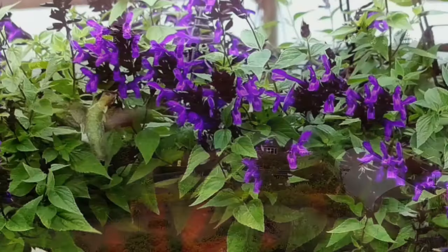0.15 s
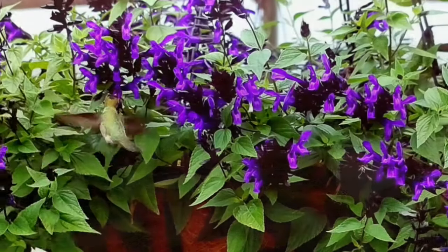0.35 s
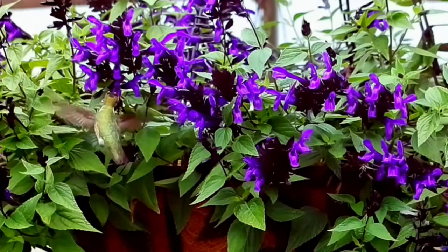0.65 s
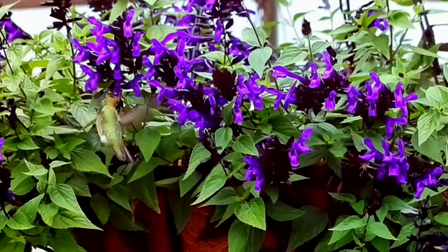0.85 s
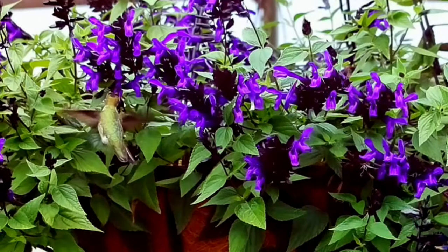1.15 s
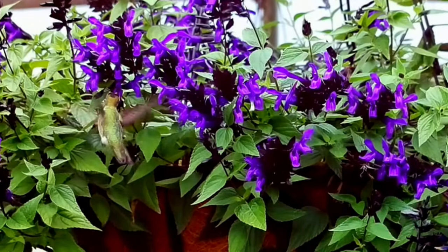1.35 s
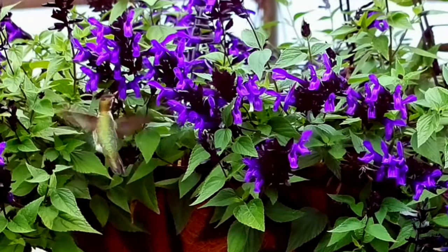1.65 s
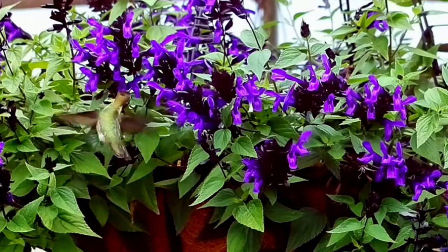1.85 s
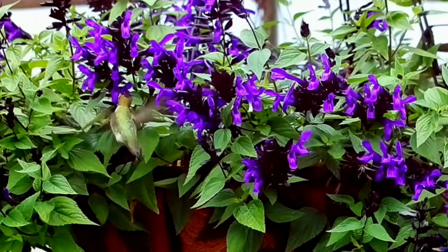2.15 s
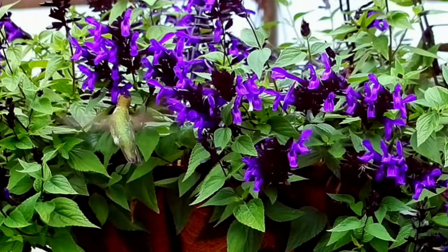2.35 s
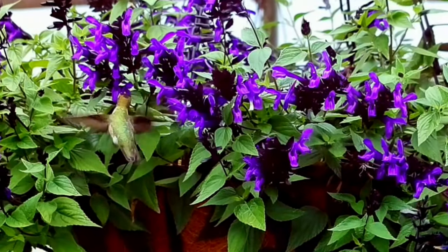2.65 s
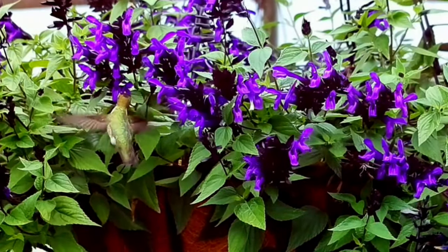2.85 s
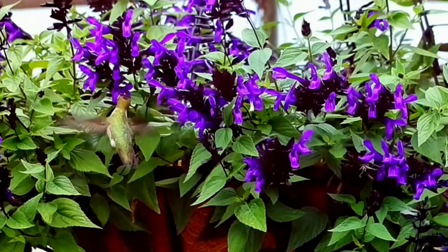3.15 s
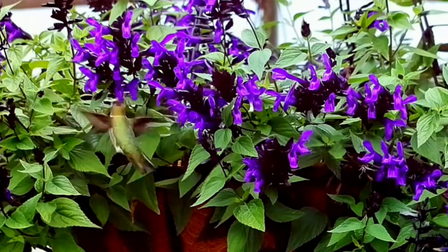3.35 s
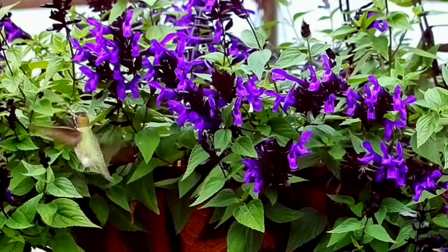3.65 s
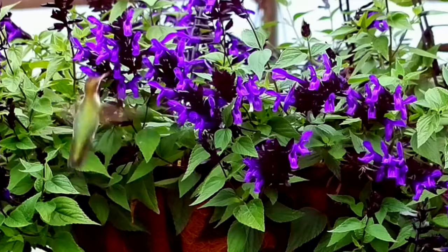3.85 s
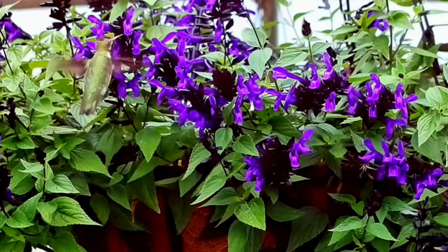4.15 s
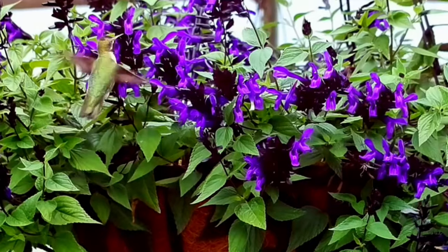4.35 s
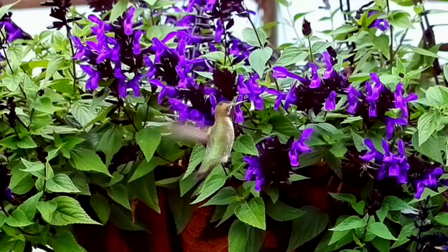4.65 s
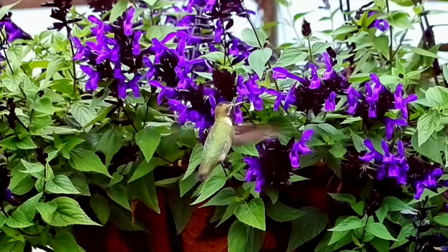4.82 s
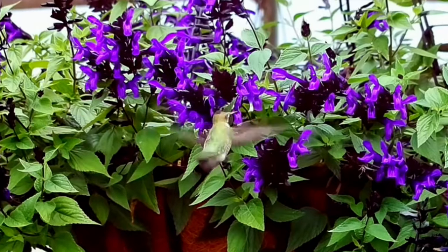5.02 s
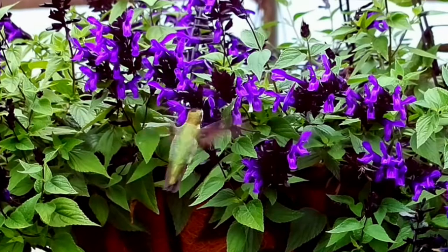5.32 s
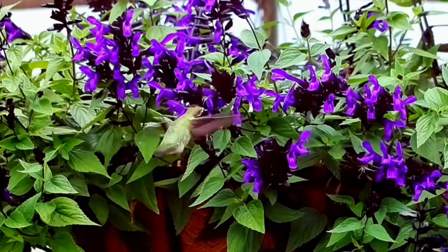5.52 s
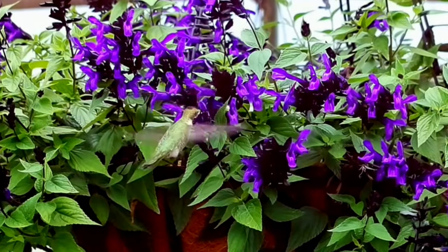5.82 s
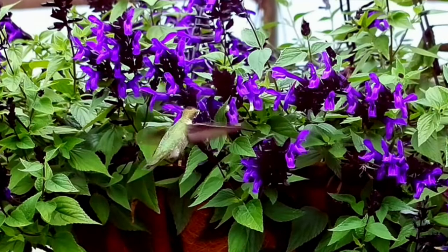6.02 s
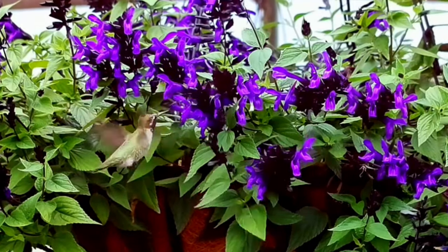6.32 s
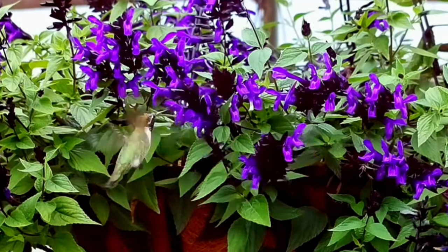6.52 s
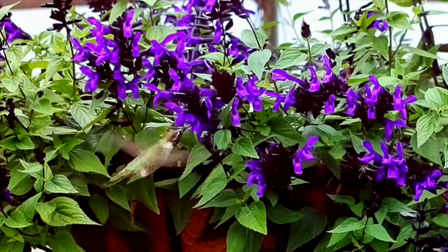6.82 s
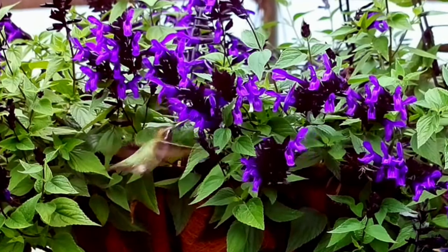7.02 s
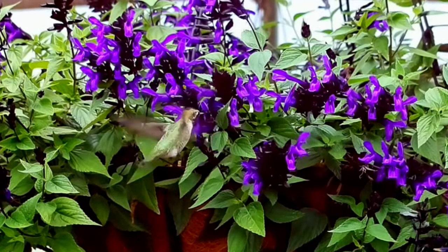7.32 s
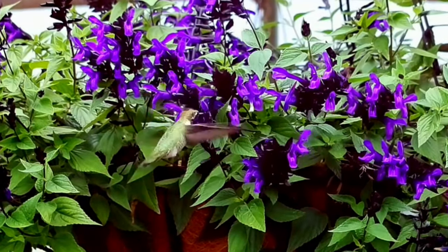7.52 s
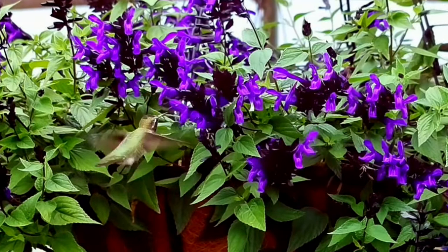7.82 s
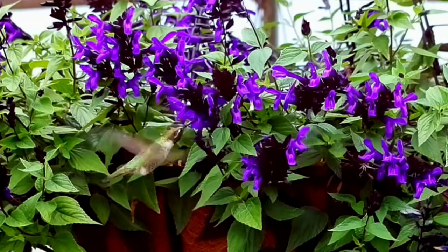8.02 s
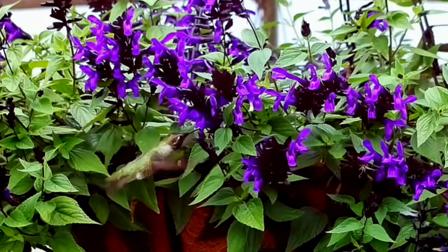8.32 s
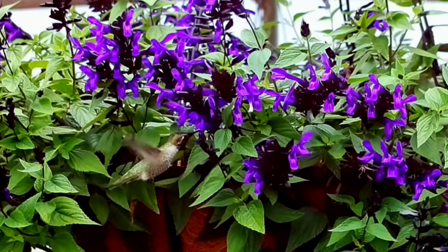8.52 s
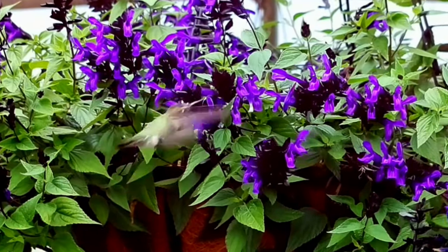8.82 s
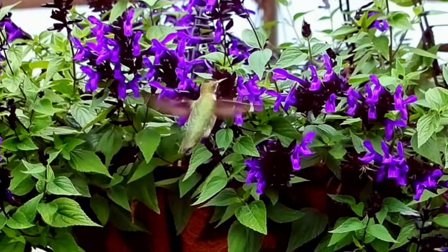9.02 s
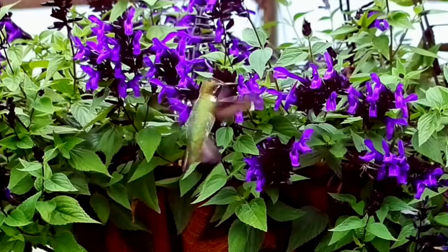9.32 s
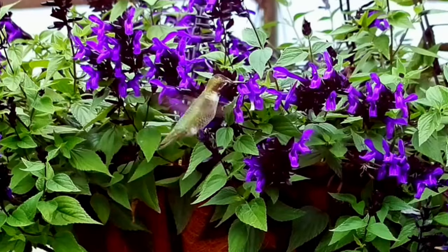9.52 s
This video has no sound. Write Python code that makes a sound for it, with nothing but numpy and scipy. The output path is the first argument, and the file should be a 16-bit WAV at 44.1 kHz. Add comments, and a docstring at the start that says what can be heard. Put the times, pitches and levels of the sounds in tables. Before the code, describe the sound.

A hummingbird gives five sharp high chips, pauses, then breaks into a long squeaky, buzzing chatter over faint outdoor hiss.

```python
"""Hummingbird in a garden.

Five sharp falling chips, a pause, then a long squeaky scolding chatter. The syrinx buzzes in fast
pulses, whines with both sides at once and breaks into rasps that end in squeals. One song figure of
whine, buzz, screech and squeal comes four times. Leaves and nearby walls scatter the calls over a
thin outdoor hiss."""
import sys
import numpy as np
from scipy import signal
from scipy.fft import rfft, irfft, next_fast_len
from scipy.io import wavfile
from scipy.ndimage import uniform_filter1d, map_coordinates

SR = 44100
rng = np.random.default_rng(int(sys.argv[2]) if len(sys.argv) > 2 else 0)


def wav_out(sig):
    """Save sig, one row per channel (or a flat mono array), as 16-bit PCM at SR to the path in sys.argv[1]."""
    wavfile.write(sys.argv[1], SR, np.round(np.clip(np.atleast_2d(sig).T, -1, 1) * 32767).astype(np.int16))


N = 426447
TIME_S = np.arange(N) / SR
TOP_HZ = 15950

# Call levels are set ahead of swells, filters and scatter.
# Each row: start in seconds, level in dB, length in seconds, top and bottom pitch in Hz,
# low-end gain in dB.
CHIP_NOTES = [(0.2345, -17, 0.013, 8580, 2580, 1), (0.4914, -17, .013, 8800, 2135, -1.5),
              (0.7666, -15.5, 0.012, 8730, 2670, 1), (1.017, -15.5, .0115, 8700, 2490, 2.5),
              (1.2845, -16, .0125, 8700, 2170, 5.5)]
# Sweep of a chip. Each row: share of length, share of pitch range, gain in dB.
CHIP_SHAPE = [(0, 0.99, -36), (.08, .98, -5), (.2, .92, -1.5), (.42, .77, 0.5), (0.581, .6, -1.5),
              (.7, .4, 1.5), (.8, 0.223, -9), (.92, 0.115, -14), (1, 0, -34)]
# Each row: start, attack and length in seconds, level in dB, pitch in Hz, base octave gain in dB,
# swoop depth, settling time in seconds, gain on settling in dB.
BUZZ_PHRASES = [(3.14, .075, 0.25, -36, 6940, -3.5, .14, .15, 3.5),
                (3.443, .018, .24, -31.3, 6560, -12.5, .22, 0.16, 4.5),
                (3.749, 0.02, 0.24, -37, 6635, -9.5, 0.23, 0.14, 8),
                (4.065, 0.079, 0.36, -33.5, 6905, -7.5, 0.19, .29, 3.5),
                (4.513, 0.011, 0.12, -38, 6620, -2, .18, 0.084, 0.5),
                (4.638, 0.0087, 0.17, -45.5, 6600, -14, .24, .12, 8.5),
                (4.923, .015, 0.19, -52, 6730, -5, 0.067, 0.083, -2),
                (5.131, 0.025, 0.18, -53, 7100, -5, .15, 0.14, 0),
                (5.987, .04, .05, -40.5, 6900, -9, .14, .05, 1.5),
                (6.686, 0.042, 0.28, -35.5, 6570, -8, .19, .225, 6),
                (7.024, 0.0099, .24, -36.8, 6220, -9, .28, .13, 5.5),
                (7.317, 0.013, .25, -35.5, 6107, -10.5, 0.18, 0.14, 5.5),
                (7.629, 0.056, 0.16, -41, 6370, -5.5, .18, .15, -2),
                (7.9, 0.015, .062, -43.5, 6050, -21, 0.2, .045, 3),
                (8.039, 0.057, 0.13, -50, 6550, -8, .1, 0.1, 5),
                (8.649, 0.058, 0.17, -42, 6590, -7, 0.24, 0.12, 12),
                (9.541, 0.016, 0.025, -33.5, 6470, -6, 0.16, 0.023, 0.5)]
# Each row: start and length in seconds, level in dB, swell in dB.
RASP_NOTES = [(4.621, 0.2, -44.5, 1.5), (7.773, 0.089, -40.5, -4.5), (7.882, 0.0016, -30, -1),
              (8.456, 0.0018, -44, -1), (8.679, 0.116, -46.5, 8)]
# One list per squeal. Each row: time in seconds, pitch in Hz, level in dB, roughness from 0 to 1.
SQUEAL_CONTOURS = [
    [(5.185, 4230, -41, .8), (5.225, 4320, -44.5, 0.9), (5.243, 4300, -32, 0.7), (5.265, 4100, -50, 0.5)],
    [(5.272, 4020, -40, 0.14), (5.289, 4700, -29, 0.22), (5.306, 4120, -21.5, 0.3), (5.32, 4380, -35, 0.26),
     (5.345, 4230, -46, 0.42), (5.362, 4270, -32.5, 0.4), (5.39, 4150, -50, 0.4), (5.43, 4430, -55, 0.3)],
    [(7.725, 4580, -44, 0.6), (7.738, 4300, -29.5, 0.6), (7.752, 4070, -40, 0.3)],
    [(8.285, 4600, -44, 0.5), (8.315, 4430, -37.5, 0.6), (8.35, 4200, -37.5, 0.7), (8.368, 3920, -51, 0.6)],
]
# Each row: start and length in seconds, low and high voice in Hz, scoop in octaves, swell in dB,
# level in dB, droop in octaves.
WHINE_NOTES = [(5.116, 0.053, 3690, 5210, .13, 9.5, -41, 0), (8.213, .07, 3450, 5150, .38, 13.5, -43.5, 0)]
# Each row: multiple of the low voice, multiple of the high voice, gain in dB.
WHINE_PARTIALS = [(1, 0, -2), (0, 1, -3), (2, 0, -3), (1, 1, -3.5), (0, 2, -9.5), (3, 0, -4), (2, 1, -6.5)]
# Each row: start and length in seconds, start and end pitch in Hz, level in dB, octave gain in dB,
# roughness from 0 to 1.
PEEP_NOTES = [(0.686, 0.076, 2370, 2260, -60, -23, 0), (0.849, 0.048, 2434, 2402, -50.5, -18, 0),
              (0.987, 0.029, 3460, 3620, -48, -23, .2), (1.11, 0.033, 8260, 8380, -42.5, -30, 0.06),
              (1.644, 0.07, 4670, 4830, -56, 3.5, 1), (2.456, 0.051, 6200, 7040, -50.5, -32, 0.5),
              (2.489, 0.048, 6670, 6750, -47.5, -26, 0.24), (4.635, .06, 2900, 3130, -51, 4, 0.83),
              (4.681, 0.043, 2930, 2820, -49, -5, 1), (4.742, 0.037, 2500, 2390, -47.5, -6, 1),
              (4.774, 0.052, 2320, 2374, -45.5, -11, 0.7), (7.763, 0.033, 3200, 2640, -49, 3, 0.78),
              (7.892, 0.032, 2374, 2390, -44.5, 3, 0.6)]
# Each row: time in seconds, pitch in Hz, level in dB.
TRILL_CONTOUR = [(5.33, 4270, -50), (5.39, 4320, -46), (5.445, 4170, -42.5), (5.5, 4350, -39.5),
                 (5.555, 4510, -41)]
# Each row: start in seconds, level in dB, nominal pitch in Hz.
TICK_NOTES = [(3.0819, -43.5, 6430), (3.115, -34, 7200), (3.143, -35, 7500), (3.2043, -25.5, 6730),
              (3.2528, -25.5, 6670), (3.273, -23, 6480), (4.0892, -24, 7160), (4.123, -20, 6860),
              (4.5263, -24.5, 6680), (4.6185, -25.5, 6850), (4.798, -22, 6750), (6.6445, -32.5, 6160),
              (6.6777, -28.5, 6730), (6.713, -29, 8140), (6.7282, -24, 6260), (7.0333, -28, 6760),
              (7.3285, -25, 6230), (7.4688, -17.5, 6400), (7.8815, -25.5, 3890), (7.9574, -28.5, 6940),
              (8.457, -33.5, 6550), (8.6574, -31, 7050), (8.7837, -19, 6870)]

# Song figures. Each row: start in seconds, whine, buzz and climax level in dB, whine droop in octaves.
SONG_FIGURES = [(5.671, -44, -38.5, -20.5, .02), (6.161, -44.3, -40.5, -19.5, .055),
                (8.911, -39.5, -38, -19.5, .095), (9.421, -40.5, -39, -21.5, .06)]
# Length in seconds, low and high voice in Hz, scoop in octaves, swell in dB.
FIGURE_WHINE = (.112, 4820, 5260, .07, 4.1)
# Delay, attack and length in seconds, pitch in Hz, base octave gain in dB, swoop depth.
FIGURE_BUZZ = (0.13, .012, 0.22, 6549.5, -7.5, 0.27)
# Delay and length in seconds, level in dB re climax.
FIGURE_CLICK = (.227, 0.0079, -10)
# Delay and length in seconds, swell to the climax in dB.
FIGURE_SCREECH = (.241, .043, 17)
# Each row: delay in seconds, pitch in Hz, level in dB re climax, roughness from 0 to 1.
FIGURE_SQUEAL = [(.281, 4670, -10.5, 0.3), (.293, 4895, 0, 0.4), (.306, 4300, -12.5, .4),
                 (.318, 4160, -18.5, 0.6), (.345, 4020, -16, 0.66), (.37, 3900, -29, .8)]

# Voice spectra. Each row: frequency in Hz, gain in dB.
CHIP_EQ = [(1500, -11), (2500, 2), (3300, -2), (4200, -7.5), (5500, -1), (8000, 1), (11000, 2.5),
           (13000, 0), (14500, -15), (16000, -15)]
THROAT_EQ = [(3000, -15), (4300, -8.5), (4850, 1.8), (5300, 0), (6000, -0.5), (8300, 0.5), (9400, 2),
             (11400, 3), (12700, -4.5), (14000, -5), (16000, -5.5)]
BILL_RADIATION_EQ = [(1500, -7), (2500, -1.5), (5000, -2), (11000, 1), (13000, -4.5), (14500, -15.5),
                     (16000, -15.5)]
HOARSE_EQ = [(2000, -34), (4200, -31), (4900, 13), (5250, -3), (5700, 2.5), (7500, -3), (9000, -5.5),
             (11500, 1.5), (14000, -19), (16000, -17)]
SCREECH_EQ = [(1500, -35.5), (2700, -19.5), (3600, -7.5), (5000, 1.5), (8000, 1.5), (10000, -7),
              (13000, -11), (16000, -16.5)]
TURBULENCE_EQ = [(25, -19), (70, -21), (150, -16.5), (220, -18), (400, -12.5), (600, -14.5), (1200, -15),
                 (2800, -3.5), (5000, -4.5), (11000, 4.5), (16000, -2)]

# Outdoor hiss. Each row: time in seconds, nominal level at 1-2.2 kHz in dB.
HISS_LEVELS = [(0.0, -69.5), (1.44, -69), (1.7, -74), (3.3, -73), (5.6, -72), (6.3, -69.5), (7.85, -67.5),
               (8.4, -69.5), (9.67, -69)]
# Hiss spectra. Each row: frequency in Hz, gain in dB.
HISS_EARLY_EQ = [(24, -65), (40, -36), (77, -61), (130, -37), (410, -21.5), (1430, -7.5), (1660, -6),
                 (2300, -3), (3110, -2.5), (3350, -3.5), (8240, -2), (15800, -17)]
HISS_PAUSE_EQ = [(24, -77), (40, -36), (250, -37), (643, -31), (1030, -17), (1140, -15.5), (1470, -10.5),
                 (1750, -9), (2420, -6), (2960, -5.5), (3700, -7.5), (3990, -6), (15800, -19)]
HISS_LATE_EQ = [(24, -69), (40, -59), (49, -32), (431, -38), (526, -35), (596, -38), (1110, -19.5),
                (2030, -9.5), (5960, -2), (6420, -4), (8450, -7.5), (15800, -23.5)]
# Width of the opening hiss. Each row: frequency in Hz, side re mid in dB.
HISS_SIDE_EQ = [(60, -10), (180, -6), (550, -5), (1650, -10.5), (4970, -6.5), (15000, -5)]


def amp(db):
    """Decibels to gain."""
    return 10 ** (np.asarray(db) / 20)


def unit(x):
    """Scale to rms 1."""
    return x / np.sqrt(np.mean(x ** 2) + 1e-20)


def filtered(x, response):
    """Apply a gain given as a function of Hz."""
    size = next_fast_len(N + SR // 2)
    return irfft(rfft(x, size) * response(np.fft.rfftfreq(size, 1 / SR)), size)[..., :N]


def coloured(x, eq):
    """Apply a spectrum of (Hz, dB) points."""
    points_hz, db = np.transpose(eq)
    return filtered(x, lambda hz: amp(np.interp(np.log(hz + 1), np.log(points_hz), db)))


def shaped_noise(eq):
    """Scene-long coloured noise, rms 1."""
    return unit(coloured(rng.standard_normal(N), eq))


def wobble(rate_hz, n):
    """Smooth random curve, rate_hz knots a second."""
    knot_rng = np.random.default_rng(rng.integers(2 ** 31))
    knots = knot_rng.standard_normal(int(n * rate_hz / SR) + 4)
    return map_coordinates(knots, [np.arange(n) * rate_hz / SR], mode="nearest")


def phase_of(hz):
    """Running phase of a moving frequency."""
    return 2 * np.pi * np.cumsum(hz) / SR


def note(attack_s, length_s, release_s, onset_db=15.5, fade_db=27.5):
    """Time axis and envelope: attack, hold until length_s, release."""
    t = np.arange(int((length_s + release_s) * SR)) / SR
    gate = np.clip(np.minimum(t, t[-1] - t) / .001, 0, 1)
    attack_db = -onset_db * np.maximum(1 - t / attack_s, 0)
    release_db = -fade_db * np.maximum(t - length_s, 0) / release_s
    return t, gate * amp(attack_db + release_db)


def contour(rows):
    """Start time, soft gate and per-sample columns of a call."""
    times_s, *columns = np.transpose(rows)
    t = np.arange(times_s[0], max(times_s[-1], times_s[0] + .01), 1 / SR)
    gate = np.clip(np.minimum(t - t[0], t[-1] - t) / .0011, 0, 1)
    return times_s[0], gate, [np.interp(t, times_s, column) for column in columns]


def add(track, start_s, sound):
    """Mix a sound into the track."""
    part = track[max(round(start_s * SR), 0):][:len(sound)]
    part += sound[:len(part)]


def buzzes(pulse_hz=460, slack_hz=4900, settling_s=.02, settled_swoop=.072, push_db=12, push_s=.021):
    """Each syrinx pulse is a tiny chirp. A phrase starts swooping, stuttering and hoarse, then settles."""
    out, noise = np.zeros(N), shaped_noise(HOARSE_EQ)
    delay_s, attack_s, length_s, hz, octave_db, depth = FIGURE_BUZZ
    phrases = BUZZ_PHRASES + [(s + delay_s, attack_s, length_s, db, hz, octave_db, depth, length_s, 0)
                              for s, _, db, _, _ in SONG_FIGURES]
    for start_s, attack_s, length_s, db, hz, octave_db, depth, settle_s, settle_db in phrases:
        t, envelope = note(attack_s, length_s, release_s=.032)
        n = len(t)
        settled = np.clip(.5 + (t - settle_s) / settling_s, 0, 1)
        progress = np.clip((t - settle_s) / max(t[-1] - settle_s, settling_s), 0, 1)
        arch = settled * (np.sin(np.pi * progress) - 2 / np.pi)  # pitch and level rise, then fall
        strain = depth * np.interp(t, [0, settle_s], [.6, 1])
        strain += settled * np.minimum(settled_swoop - strain, 0)
        beat = phase_of(pulse_hz * (1 + .266 * strain * wobble(200.3, n) + .0246 * wobble(40, n)))
        swoop = strain * wobble(230, n) + .0304 * wobble(2500, n) - .14 * np.sin(beat)
        # The membranes resist going below their slackest pitch: swoops reach mostly upward.
        above_slack_hz = (hz * 2 ** (.025 * arch) - slack_hz) * 2 ** (3 * swoop)
        phase = phase_of(np.minimum(slack_hz + above_slack_hz, 10500))
        flutter_db = 2 * wobble(108.8, n) + 2.6 * wobble(450, n)
        stutter_db = 7 * strain * wobble(89.6, n)
        pulses = unit(amp(8.4 * np.cos(beat) + flutter_db + stutter_db))
        tone = np.sqrt(2) * (np.sin(phase) + amp(octave_db + 3.5) * np.sin(2 * phase))
        hoarse = 2.2 * strain
        voice = (tone + hoarse * np.roll(noise, -round(start_s * SR))[:n]) / np.hypot(1, hoarse)
        onset_db = push_db * np.exp(-(t + attack_s) / push_s)  # faster attack, harder push
        level_db = db + .2 + onset_db + settle_db * settled + 3 * arch
        add(out, start_s, amp(level_db) * envelope * pulses * voice)
    return coloured(out, THROAT_EQ)


def chips(octave_db=-6, third_re_octave_db=-8):
    """Fast downward sweeps; overtones come out as the pitch drops."""
    out = np.zeros(N)
    place, height, swell_db = np.transpose(CHIP_SHAPE)
    for start_s, db, length_s, top_hz, bottom_hz, low_db in CHIP_NOTES:
        progress = np.linspace(0, 1, int(length_s * SR))
        phase = phase_of(bottom_hz + (top_hz - bottom_hz) * np.interp(progress, place, height))
        overtone_gain = amp(octave_db + 60 * np.minimum(progress - .65, 0))
        third = amp(third_re_octave_db) * (progress > .7) * np.sin(3 * phase)
        voice = np.sin(phase) + overtone_gain * (np.sin(2 * phase) + third)
        shape_db = np.interp(progress, place, swell_db) + np.interp(progress, [.7, .82], [0, low_db])
        add(out, start_s, amp(db + shape_db) * voice)
    return out


def rasps(pitch_hz=4000, chaos_oct=.36):
    """Driven hard, the voice turns chaotic and its partials smear into noise."""
    out, noise = np.zeros(N), shaped_noise(SCREECH_EQ)
    delay_s, length_s, click_db = FIGURE_CLICK
    clicks = [(s + delay_s, length_s, db + click_db, 0) for s, _, _, db, _ in SONG_FIGURES]
    delay_s, length_s, swell_db = FIGURE_SCREECH
    screeches = [(s + delay_s, length_s, db - swell_db, swell_db) for s, _, _, db, _ in SONG_FIGURES]
    for start_s, length_s, db, swell_db in RASP_NOTES + clicks + screeches:
        t, envelope = note(attack_s=.00086, length_s=length_s, release_s=.013)
        n = len(t)
        phase = phase_of(pitch_hz * 2 ** (chaos_oct * np.tanh(wobble(700, n))))
        voice = amp(-7) * np.sin(phase) + np.sin(2 * phase) + amp(-4.5) * np.sin(3 * phase)
        voice += np.roll(noise, -round(start_s * SR))[:n]
        envelope *= amp(db + swell_db * np.minimum(t / length_s, 1))
        add(out, start_s, envelope * unit(voice * amp(2.5 * wobble(700, n))))
    return out


def squeals(jitter=.052):
    """Quivering glides, heard mainly at the second partial."""
    out = np.zeros(N)
    in_songs = [np.add(FIGURE_SQUEAL, (s, 0, db, 0)) for s, _, _, db, _ in SONG_FIGURES]
    for rows in SQUEAL_CONTOURS + in_songs:
        start_s, gate, (hz, db, rough) = contour(rows)
        n = len(gate)
        phase = phase_of(hz * (1 + jitter * rough * wobble(1361, n)))
        voice = amp(-21.5) * np.sin(phase) + np.sin(2 * phase) + amp(-18) * np.sin(3 * phase)
        add(out, start_s, amp(db) * gate * unit(voice * amp(4.5 * rough * wobble(300, n))))
    return out


def whines(quiver_db=2, scoop_s=.028, high_scoop_share=.65):
    """Both sides of the syrinx slide up to different pitches and mix into sum tones."""
    out = np.zeros(N)
    in_songs = [(s, *FIGURE_WHINE, db, droop_oct) for s, db, _, _, droop_oct in SONG_FIGURES]
    for start_s, length_s, low_hz, high_hz, scoop_oct, swell_db, db, droop_oct in WHINE_NOTES + in_songs:
        t, envelope = note(attack_s=.014, length_s=length_s, release_s=.039)
        n = len(t)
        progress = np.minimum(t / length_s, 1)
        slide = 2 ** (-scoop_oct * np.exp(-t / scoop_s))
        droop = 2 ** (-droop_oct * progress ** 2)
        low, high = (phase_of(hz * (1 + .018 * wobble(1800, n) + .008 * wobble(150, n)))
                     for hz in (low_hz * slide * droop, high_hz * slide ** high_scoop_share))
        voice = sum(amp(partial_db + 1.07 * wobble(113, n)) * np.sin(j * low + k * high)
                    for j, k, partial_db in WHINE_PARTIALS)
        envelope *= amp(db + swell_db * progress)
        add(out, start_s, envelope * unit(voice * amp(quiver_db * wobble(1500, n))))
    return out


def trill(start_s=5.327, step_s=.0176, length_s=.014, count=14, octave_db=-1, rough=.23):
    """Rows for evenly spaced peeps that grow louder and climb a little."""
    times_s, hz, db = np.transpose(TRILL_CONTOUR)
    starts_s = start_s + step_s * np.arange(count)
    notes = zip(starts_s, np.interp(starts_s, times_s, hz), np.interp(starts_s, times_s, db))
    return [(s, length_s, note_hz, note_hz, note_db, octave_db, rough) for s, note_hz, note_db in notes]


def peeps(jitter=.06, third_re_octave_db=-9):
    """Soft short notes, clear or scratchy, single or trilled."""
    out = np.zeros(N)
    for start_s, length_s, start_hz, end_hz, db, octave_db, rough in PEEP_NOTES + trill():
        n = int(length_s * SR)
        phase = phase_of(np.geomspace(start_hz, end_hz, n) * (1 + jitter * rough * wobble(1000, n)))
        third = amp(third_re_octave_db) * (3 * start_hz < TOP_HZ) * np.sin(3 * phase)
        voice = np.sin(phase) + amp(octave_db) * (np.sin(2 * phase) + third)
        swell = np.hanning(n) * unit(amp(3.6 * rough * wobble(400, n)))
        add(out, start_s, np.sqrt(2) * amp(db) * swell * voice)
    return out


def ticks(rise_s=.0011, fall_oct_per_s=70):
    """Single rough pulses of the voice, falling in pitch."""
    out, t = np.zeros(N), np.arange(SR // 100) / SR
    envelope = t / rise_s * np.exp(1 - t / rise_s)
    for start_s, db, hz in TICK_NOTES:
        phase = phase_of(hz * 2 ** (.15 - fall_oct_per_s * t + .18 * wobble(3000, len(t))))
        add(out, start_s, amp(db + 1) * envelope * (np.sin(phase) + .32 * np.sin(2 * phase)))
    return out


def turbulence(voice, db):
    """Broadband noise that follows the loudness of the voice."""
    loudness = np.sqrt(np.abs(uniform_filter1d(voice ** 2, size=64)))
    return amp(db) * loudness * shaped_noise(TURBULENCE_EQ)


def low_whiff(centre_s=5.3, width_s=.029, db=-74):
    """One soft low whiff with the loudest lone squeal."""
    noise = shaped_noise([(100, -28), (280, -20), (400, 0), (560, -2), (900, -8), (3000, -44)])
    return amp(db) * np.exp(-((TIME_S - centre_s) / width_s) ** 2) * noise


def garden(x, near_db, near_t60_s, far_db, far_t60_s, delay_s):
    """Direct sound, quick scatter from leaves and walls, faint longer tail. Returns mid and side."""
    t = np.arange(SR // 2) / SR
    response = np.zeros((2, len(t)))
    for db, t60_s in ((near_db, near_t60_s), (far_db, far_t60_s)):
        decay = amp(-60 * t / t60_s) * (t > delay_s)
        response += amp(db) * decay / np.linalg.norm(decay) * rng.standard_normal(response.shape)
    response[0, 0] = 1  # direct path
    return signal.fftconvolve(x[None], response / np.linalg.norm(response[0]), axes=1)[:, :N]


def opening_echo(db=-41, t60_s=.19):
    """Decaying noise: the echo of a chip dies away as the scene opens."""
    return amp(db - 60 * TIME_S / t60_s) * shaped_noise(SCREECH_EQ)


def hiss():
    """Thin outdoor hiss, mid and side. Wide during the chips, then mono; dips in the pause."""
    early = np.interp(TIME_S, [1.46, 1.53], [1, 0])
    late = np.interp(TIME_S, [3.05, 4.8], [0, 1])
    stages = (early, HISS_EARLY_EQ, .5), (1 - early - late, HISS_PAUSE_EQ, .5), (late, HISS_LATE_EQ, .3)
    out = np.zeros((2, N))
    for share, eq, trim_db in stages:
        noise = coloured(rng.standard_normal((2, N)), eq)
        band = filtered(noise, lambda hz: (hz > 1000) & (hz < 2200))
        out += np.sqrt(share.clip(0)) * amp(trim_db) * noise / band.std()
    level_db = np.interp(TIME_S, *np.transpose(HISS_LEVELS)) + .59 * wobble(9.3, N)
    mid, side = out * amp(level_db)
    return np.array([mid, early * coloured(side, HISS_SIDE_EQ)])


def scene():
    """Chips slightly right, then chatter straight ahead. Returns left and right."""
    calls = coloured(chips(), CHIP_EQ)
    chatter = coloured(buzzes() + rasps() + squeals() + whines() + peeps() + ticks(), BILL_RADIATION_EQ)
    calls_mid, calls_side = garden(calls + turbulence(calls, db=-43), near_db=-3.5, near_t60_s=.056,
                                   far_db=-11, far_t60_s=.2, delay_s=.0024)
    chatter_mid, _ = garden(chatter + turbulence(chatter, db=-19), near_db=-2, near_t60_s=.057,
                            far_db=-11.5, far_t60_s=.27, delay_s=.00047)
    hiss_mid, hiss_side = hiss()
    mid = calls_mid + chatter_mid + opening_echo() + low_whiff() + hiss_mid
    side = amp(-9.5) * calls_side - amp(-25) * calls_mid + hiss_side
    return np.array([mid + side, mid - side])


def record(dry):
    """Brick-wall low-pass at TOP_HZ."""
    return filtered(dry, lambda hz: hz < TOP_HZ)


dry = scene()
out = record(dry)
wav_out(out)
```